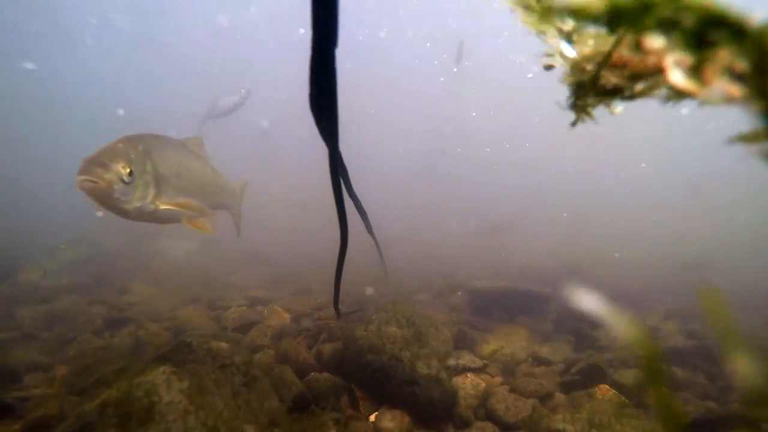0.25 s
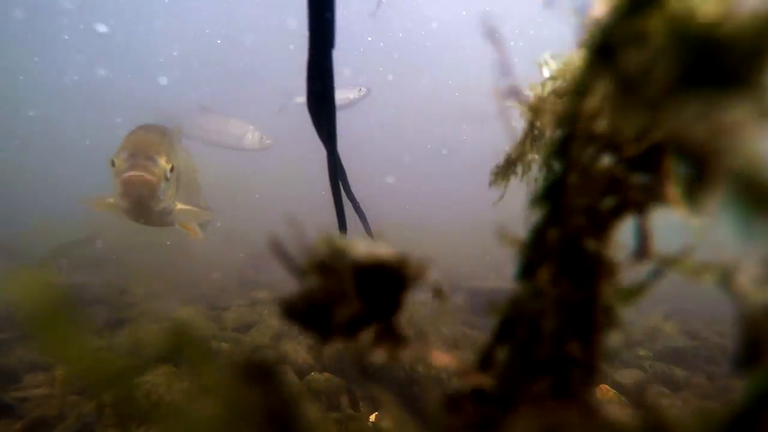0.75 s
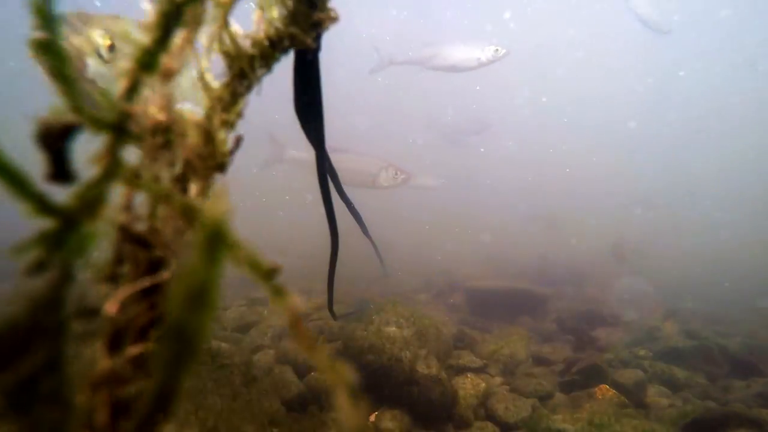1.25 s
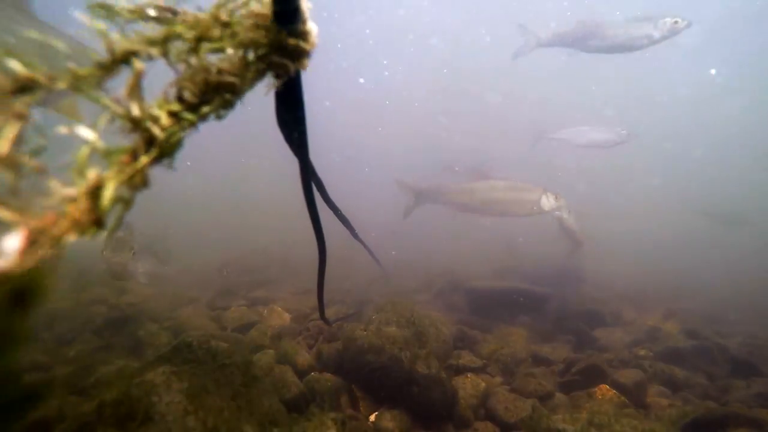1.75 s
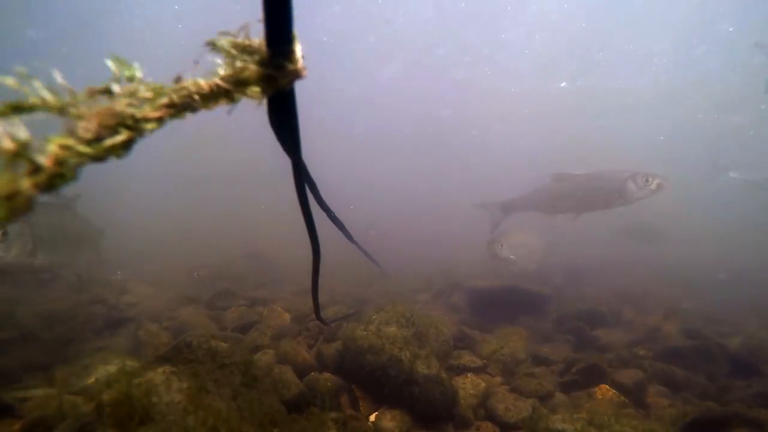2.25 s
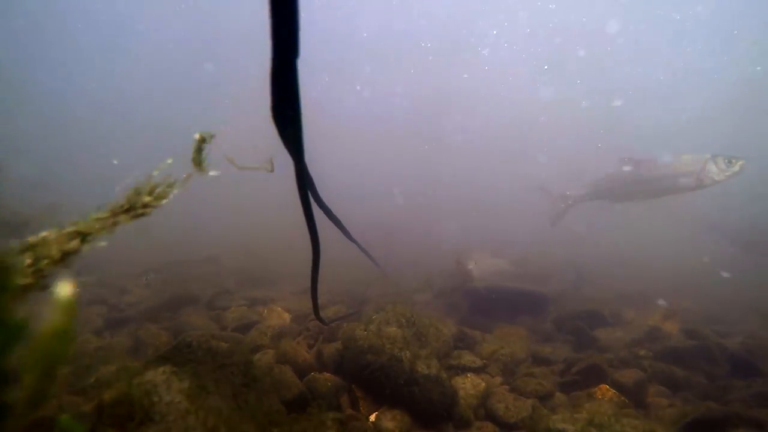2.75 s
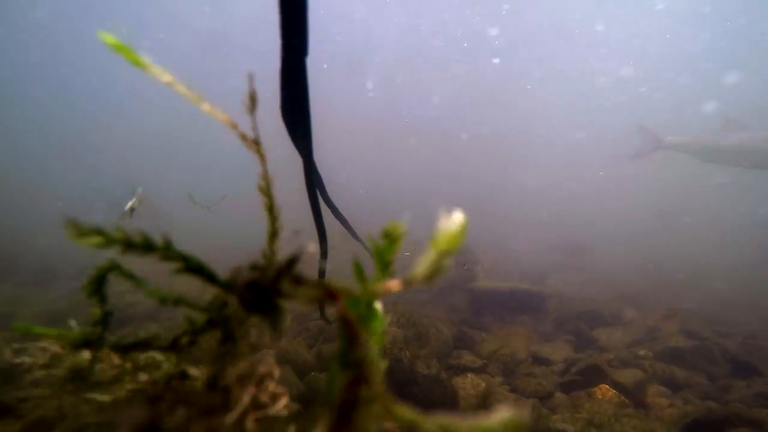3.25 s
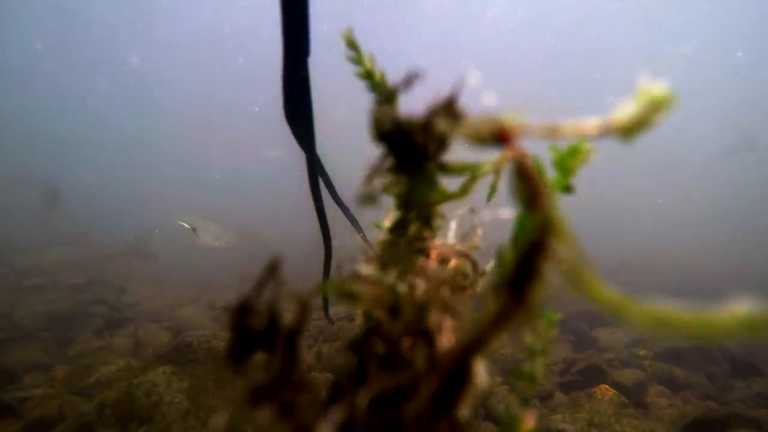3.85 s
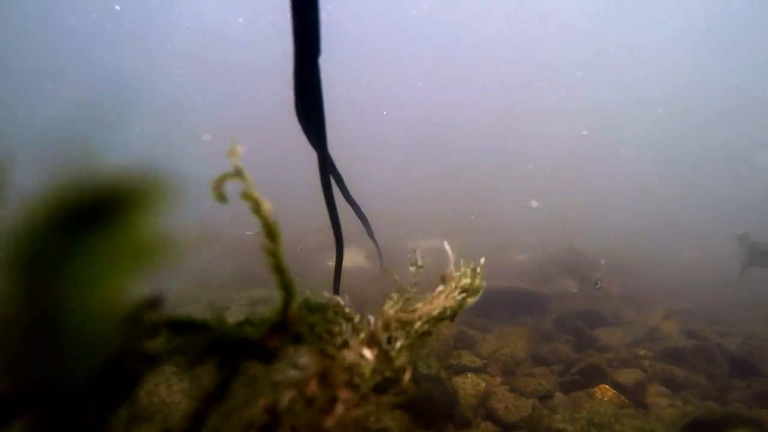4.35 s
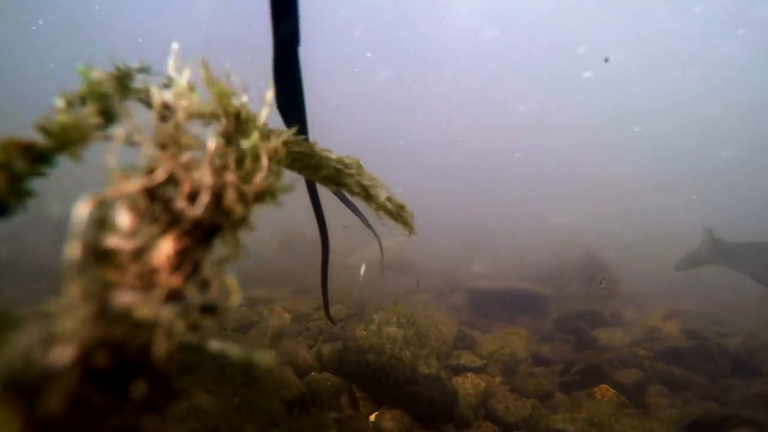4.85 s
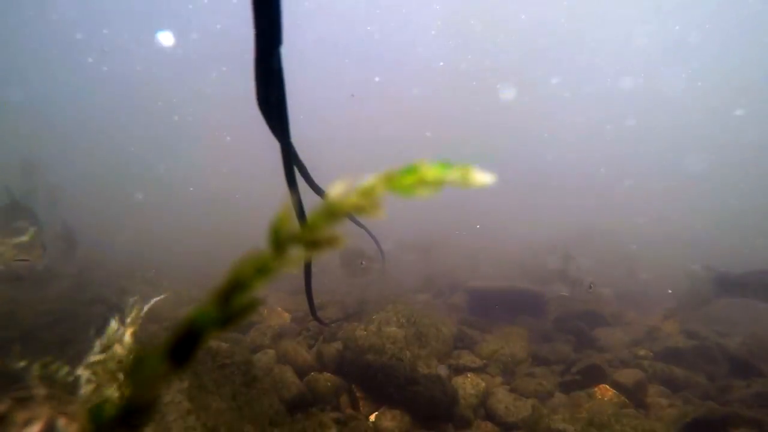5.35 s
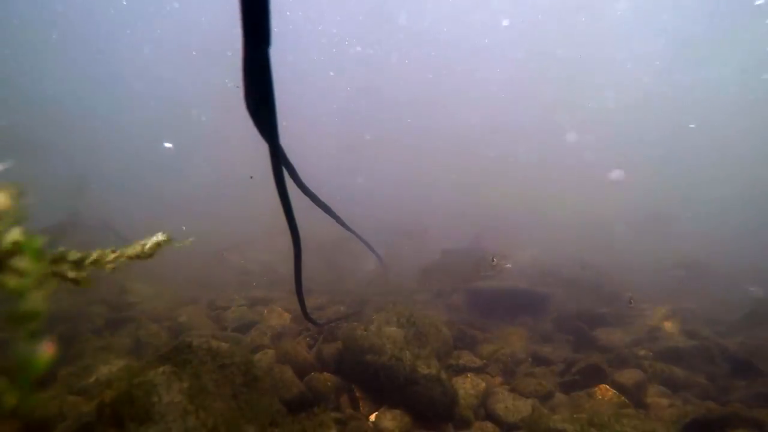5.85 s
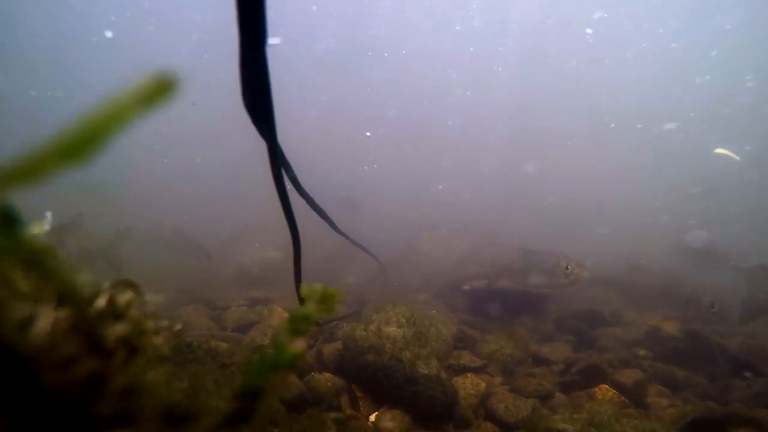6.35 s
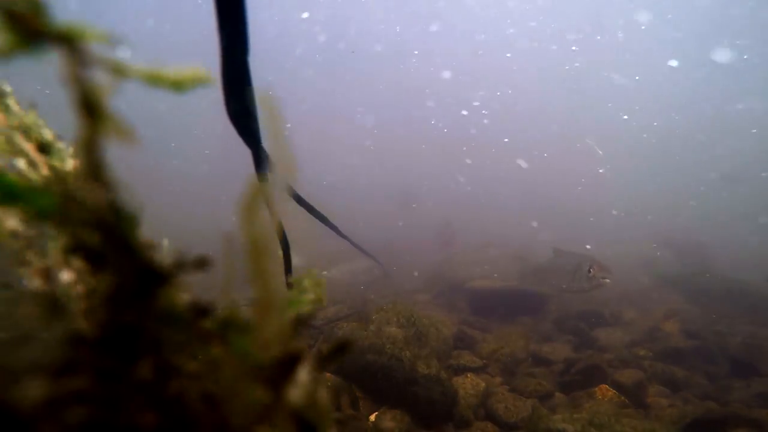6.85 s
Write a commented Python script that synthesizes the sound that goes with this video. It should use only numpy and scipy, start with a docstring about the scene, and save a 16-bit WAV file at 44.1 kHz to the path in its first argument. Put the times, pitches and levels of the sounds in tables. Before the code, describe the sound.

A close, muffled underwater sound from inside a watertight case on a stony river bed. Deep rumble dominates, swelling and easing in uneven lumps, over a hollow mid-low hum, gurgling, faint bubble fizz and thin hiss. In the first 0.2 s weed crackles and bumps softly among tiny ticks; a bubble bloops at 0.6 with a heavy shove, and more brushing passes around 0.7 and 1.15. A soft bump comes at 1.3. From 1.5 to 5.2 a barely audible focus motor chatters about ten times a second. Bubbles round off near 2.4 and 3.5, where the rumble surges. Around 4.0 to 4.1 weed crackles densely, with a thud and two hard gravel clicks. Bright ticks dot 4.2 to 5.3. The current dips at 5.5, a knock lands at 5.6, then rumble returns, with a bump at 6.4 and bubble plops at 6.2, 6.45 and 6.9. A faint motor whine appears near 7.0.

```python
"""Low rumble of eddies buffeting a camera's watertight case on a river bed below a small weir.
Shaped noise makes the rumble; resonant walls hum, and weed bumps the case with clicks and damped rings.
Gravel cracks, close bubbles and grit tick, larger bubbles swell and sink in pitch: short rings and noise.
Behind them lie a fizz of near and far bubbles, the microphone's filtered hiss, and the focus motor's
chatter of noise steps and brief sine whine."""
import sys
import numpy as np
from scipy import signal
from scipy.fft import rfft, irfft
from scipy.io import wavfile
from scipy.ndimage import uniform_filter1d

SR = 44100
rng = np.random.default_rng(int(sys.argv[2]) if len(sys.argv) > 2 else 0)


def output_pcm(signal):
    """Save a mono or channel-first signal as 16-bit PCM at the path in sys.argv[1].

    Samples are clipped to [-1, 1] before scaling.
    """
    pcm = np.clip(np.atleast_2d(signal).T, -1, 1) * 32767
    wavfile.write(sys.argv[1], SR, np.round(pcm).astype(np.int16))


N = 313110
TIME = np.arange(N) / SR


def amp(db):
    """Decibels to gain."""
    return 10 ** (np.asarray(db) / 20)


def unit(x):
    """Scales to rms 1."""
    return x / np.sqrt(np.mean(x ** 2) + 1e-20)


def steadied(x, size):
    """Holds the rms near 1 over every stretch of about size samples."""
    power = uniform_filter1d(uniform_filter1d(x ** 2, size), size)
    return x / np.sqrt(power + 1e-20)


def add(mix, s, sound):
    """Mixes a sound in at time s."""
    part = mix[max(round(s * SR), 0):][:len(sound)]
    part += sound[:len(part)]


def lowpass(x, hz):
    """Keeps what lies below hz, without delay."""
    return signal.sosfiltfilt(signal.butter(4, hz, fs=SR, output="sos"), x)


def decay(t, t60):
    """Exponential fade that falls by 60 dB in t60 seconds."""
    return np.exp(-np.log(1000) * t / t60)


def noise(spectrum):
    """Steady noise of rms 1 with the given spectrum."""
    hz, db = np.transpose(spectrum)
    bins = np.fft.rfftfreq(N, 1 / SR)
    gain = amp(np.interp(np.log(bins + 1), np.log(hz), db))
    return unit(irfft(rfft(rng.standard_normal(N)) * gain, N))


def wander(hz):
    """Random drift of rms 1, mostly no faster than about hz."""
    gain = np.exp(-(np.fft.rfftfreq(N, 1 / SR) / hz) ** 2)
    return unit(irfft(rfft(rng.standard_normal(N)) * gain, N))


def throb(hz, unevenness=0.391):
    """A swing between -1 and 1 that repeats about hz times a second, never quite evenly."""
    rate = hz * (1 + unevenness * wander(hz))
    return np.sin(2 * np.pi * np.cumsum(rate) / SR)


def swell(s, length):
    """A smooth arch from 0 up to 1 and back, centred on time s."""
    return np.cos(np.pi * np.clip((TIME - s) / length, -.5, .5)) ** 2


def ring(hz, t60, rise, sag=0.):
    """A dying sine of peak about 1; it swells in over rise seconds and its pitch falls by sag a second."""
    t = np.arange(SR // 5) / SR
    shape = (1 - np.exp(-(t / rise) ** 2)) * decay(t, max(t60, .002))
    return shape / shape.max() * np.sin(2 * np.pi * hz * (t - sag * t ** 2 / 2))


def snap(low_hz, high_hz, t60):
    """A burst of band-limited noise that starts near rms 1 and dies at once."""
    t = np.arange(SR // 5) / SR
    edges = [low_hz, np.clip(high_hz, low_hz + 1, SR / 3)]
    band = signal.butter(2, edges, "band", fs=SR, output="sos")
    burst = signal.sosfilt(band, rng.standard_normal(len(t)))
    return steadied(burst, size=90) * decay(t, t60)


def bubbles(per_s, low_hz, high_hz, t60, spread_db):
    """A swarm of rms 1: bubbles of random size are born at random moments, each ringing at its own pitch."""
    out, pitches = np.zeros(N), np.geomspace(low_hz, high_hz, num=24)
    for hz in pitches:
        births = rng.random(N) < per_s / len(pitches) / SR
        sizes = amp(spread_db * np.minimum(rng.exponential(1, N), 3))
        out += signal.oaconvolve(births * sizes, ring(hz, t60, rise=t60 / 10))[:N]
    return unit(out)


# Strength of the current at the case: (t/s, level/dB), scaled down where it moves quieter layers
CURRENT = [(0, -12), (0.18, 2), (0.46, -11), (0.8, -2.5), (1.15, -7), (1.6, -1.5), (2.35, -3.5),
           (2.7, -1.5), (3.08, -5.5), (3.4, 1.5), (4.1, 1), (4.75, -3.5), (5.32, 1), (5.54, -8), (6.0, -1),
           (6.28, 3), (6.65, 0.5), (7.1, 1.5)]


def flow_db():
    """Strength of the current over time, in dB, between its listed points."""
    return np.interp(TIME, *np.transpose(CURRENT))


# Weed brushing along the case: (middle t/s, length/s, crackle rise level/dB, buffeting rise level/dB)
WEED_BRUSHES = [(0.085, 0.22, 10.5, 9), (0.693, 0.28, 7, 0), (1.145, 0.28, 4.5, 2), (3.498, 0.46, -2.5, 4),
                (3.835, 0.17, -2, 7.5), (4.007, 0.23, 9, 9), (4.112, 0.13, 11.5, 10),
                (4.56, 0.27, 6.5, 7.5), (4.793, 0.13, -2, 8), (4.986, 0.12, 4, 8), (5.66, 0.19, -3, 5.5),
                (6.073, 0.14, -2, 5), (6.302, 0.17, 1, 9), (6.69, 0.15, 4.5, 4.5)]


def weed_db():
    """Rises of the crackle and of the buffeting, in dB, as weed brushes past."""
    crackle = sum(db * swell(s, length) for s, length, db, _ in WEED_BRUSHES)
    buffeting = sum(db * swell(s, length) for s, length, _, db in WEED_BRUSHES)
    return crackle, buffeting


# Microphone hiss spectrum, shape only: (f/Hz, level/dB per Hz)
HISS_SPECTRUM = [(100, 10.5), (900, 1), (3000, -2.5), (5000, -2.5), (6400, -4.5), (7500, -7.5),
                 (10500, -10), (13300, -9), (15000, -12.5)]


def hiss(level_db=-68.5):
    """The microphone's own steady noise."""
    return amp(level_db) * noise(HISS_SPECTRUM)


# Spectrum of the motor's steps, shape only: (f/Hz, level/dB per Hz)
STEP_SPECTRUM = [(4800, -18.5), (5900, -8), (6350, 5.5), (7300, -24), (8900, -7), (10400, -32),
                 (11550, -6.5), (11950, -12.5), (12300, -2), (13000, -13), (13600, -27)]
# Lens nudges, about ten a second: (middle t/s)
LENS_NUDGES = [1.466, 1.504, 1.538, 1.648, 1.739, 1.837, 1.944, 2.009, 2.117, 2.206, 2.308, 2.419, 2.511,
               2.585, 2.674, 2.774, 2.882, 2.987, 3.025, 3.185, 3.241, 3.36, 3.441, 3.507, 3.615, 3.708,
               3.807, 3.914, 3.993, 4.079, 4.177, 4.259, 4.344, 4.492, 4.527, 4.61, 4.72, 4.812, 4.913,
               4.993, 5.078, 5.203]


def focus_chatter(level_db=-66.5, step_s=0.0061, step_t60=0.017, jitter_s=0.00084, count=4):
    """Each nudge of the focus motor is a quick run of sharp little noise steps."""
    steps, t = np.zeros(N), np.arange(SR // 50) / SR
    for s in LENS_NUDGES:
        for k in range(count):
            even = s + (k - (count - 1) / 2) * step_s
            add(steps, even + jitter_s * rng.standard_normal(), decay(t, step_t60))
    return amp(level_db) * steps * steadied(noise(STEP_SPECTRUM), size=90)


# Longer runs of the focus motor: (middle t/s, length/s)
MOTOR_RUNS = [(1.367, 0.14), (7.04, 0.081)]


def focus_whine(db=-78.5, hz=10540, waver_hz=130):
    """The focus motor runs briefly with a thin, wavering whistle."""
    running = sum(np.sqrt(swell(s, length)) for s, length in MOTOR_RUNS)
    pitch = hz + waver_hz * wander(waver_hz)  # depth and speed of the waver share one figure
    return amp(db) * running * np.sin(2 * np.pi * np.cumsum(pitch) / SR)


# Spectrum of the far bubbles, shape only: (f/Hz, level/dB per Hz)
FAR_BUBBLES = [(600, -32), (1050, -22), (1400, -2), (2300, 1), (2800, -1), (3500, -2), (4300, -7.5),
               (9000, -46)]


def fizz(wash_db=-76.5, near_db=-78.0, clump_db=1.6, clump_hz=13.0, flow_share=0.035, crackle_db=-78):
    """A noise wash of far bubbles and clumps of nearer rings; brushing weed adds a dry, dense crackle."""
    near = bubbles(per_s=220, low_hz=1291, high_hz=3642, t60=0.033, spread_db=2.1)
    near *= amp(clump_db * wander(clump_hz))
    water = amp(wash_db) * noise(FAR_BUBBLES) + amp(near_db) * near

    weed, _ = weed_db()
    crackle = bubbles(per_s=1000, low_hz=1020, high_hz=3880, t60=0.0076, spread_db=2.5)
    crackle *= np.sqrt(np.maximum(amp(weed) ** 2 - 1, 0))  # silent unless weed raises the level
    return amp(flow_share * flow_db()) * water + amp(crackle_db) * crackle


# Wall resonances of the case: (f/Hz, width of one pass/Hz, level/dB)
WALL_MODES = [(617, 280, -3), (686, 145, 3), (859, 205, -8)]


def walls(x):
    """What the walls pass on of a push; each resonance acts twice, so its skirts are steep."""
    out = np.zeros(len(x))
    for k, (hz, width, db) in enumerate(WALL_MODES):
        b, a = signal.iirpeak(hz, hz / width, SR)
        passed = signal.lfilter(b, a, signal.lfilter(b, a, x))
        out += (-1) ** k * amp(db) * passed  # neighbouring modes in opposite phase
    return out


# Slow level of the hum in the walls: (t/s, level/dB)
WALL_HUM = [(0, 1), (0.95, -2.5), (1.9, -2), (2.6, 2), (3.45, 2), (4.1, 2.5), (4.35, -0.5), (6.4, 2),
            (7.1, 0)]


def hum(flutter_db=1.0, flutter_hz=25, wash_db=-75, gurgle_db=-78.5,
        flow_share=0.18, surge_db=1.5, surge_hz=5):
    """Churning water below the weir rings the walls in loose surges; large bubbles gurgle near their pitch."""
    churn = rng.standard_normal(N) * amp(flutter_db * wander(flutter_hz))
    gurgle = bubbles(per_s=55, low_hz=568.5, high_hz=762.3, t60=0.12, spread_db=3.5)
    level_db = np.interp(TIME, *np.transpose(WALL_HUM))
    level_db += flow_share * flow_db() + surge_db * wander(surge_hz)
    return amp(level_db) * (amp(wash_db) * unit(walls(churn)) + amp(gurgle_db) * gurgle)


# Larger passing bubbles: (peak t/s, peak level/dB, pitch at the peak f/Hz, fade t60/s)
LARGE_BUBBLES = [(0.618, -54.5, 729, 0.26), (0.618, -65, 1320, 0.08), (2.381, -61, 520, 0.074),
                 (3.42, -62, 620, 0.12), (3.575, -57.5, 614, 0.28), (3.583, -64, 940, 0.079),
                 (6.18, -63.5, 587, 0.27), (6.455, -55.5, 653, 0.057), (6.875, -58.5, 678, 0.16)]


def bloops(swell_s=0.0072, soft_s=0.0019, sag=0.815, wobble=0.015, wobble_hz=35):
    """Each larger bubble swells in, rounds off and fades; its pitch wobbles and falls by sag a second."""
    out, t = np.zeros(N), np.arange(-SR // 10, SR // 5) / SR
    away = np.hypot(t, soft_s) - soft_s  # distance from the peak in seconds, rounded at the top
    for s, db, hz, t60 in LARGE_BUBBLES:
        shape = np.exp(-away * np.where(t < 0, 1 / swell_s, np.log(1000) / t60))
        pitch = hz * (1 - sag * t + wobble * wander(wobble_hz)[:len(t)])
        tone = np.sin(2 * np.pi * np.cumsum(pitch) / SR)
        add(out, s + t[0], amp(db) * shape * tone)
    return out


# Nearest bubbles and grains: (t/s, level/dB before the trim, pitch f/Hz, snap level/dB re the ring)
NEAR_TICKS = [(0.044, -57.5, 2750, -5), (0.087, -57.5, 1800, 2), (0.101, -54.5, 3350, -10),
              (0.245, -55, 2820, -9), (0.678, -56.5, 2760, -8), (0.7245, -49, 1424, -9),
              (0.724, -57, 2280, -7), (1.026, -58, 3270, -3), (1.058, -59, 2700, -1),
              (1.120, -57.5, 3200, -4), (1.153, -60.5, 1550, -10), (1.189, -58, 2270, 4),
              (1.943, -59, 1870, -5), (2.015, -59.5, 2200, -8), (2.183, -55.5, 2380, -16),
              (3.123, -53.5, 1450, -1), (3.313, -51, 2190, -15), (3.411, -61, 1970, -14),
              (3.774, -52, 2410, -2.5), (3.823, -53.5, 1410, 5), (4.213, -56, 2280, -16),
              (4.456, -54, 3310, -11), (4.493, -62.5, 1430, 8.5), (4.570, -55, 1490, 2),
              (4.923, -49, 2180, -16), (5.104, -50.5, 2236, -14), (5.256, -56, 1400, -7),
              (5.301, -67, 2260, -8), (5.321, -55, 1420, 0), (5.532, -54, 3600, -9), (6.091, -49, 893, -17),
              (6.181, -60, 1400, -16), (6.273, -57, 1550, -13), (6.326, -52.5, 1810, -6),
              (6.415, -61.5, 1730, 5), (6.483, -59, 1880, -10), (6.686, -58, 2450, -5),
              (6.717, -60, 2500, -6), (6.851, -58, 1600, -7), (6.943, -56.5, 2010, -14)]


def ticks(trim_db=-2.5, ring_t60=0.034, ring_hz=2100, shortening=0.44, snap_t60=0.019,
          snap_below=0.67, snap_reach=1.66, rise_share=0.027, sag=0.8, debris_db=-15, debris_t60=0.076):
    """A short ring with a snap of noise and a faint debris tail; low ones ring longer and rise more gently."""
    out = np.zeros(N)
    for s, db, hz, snap_db in NEAR_TICKS:
        band = (hz * snap_below, hz * snap_reach)
        t60 = ring_t60 * (ring_hz / hz) ** shortening  # ring_t60 holds at ring_hz
        tone = ring(hz, t60, rise_share * t60, sag)
        edge = snap(*band, snap_t60) + amp(debris_db) * snap(*band, debris_t60)
        add(out, s, amp(db + trim_db) * (tone + amp(snap_db) * edge))
    return out


# High modes of the case's shell: (f/Hz, t60/s)
SHELL_MODES = [(1250, 0.02), (1800, 0.021), (3400, 0.015), (3850, 0.012)]
# Gravel hits, each at another spot: (t/s, crack level/dB, then peak level/dB of each of four shell modes)
GRAVEL_HITS = [(4.062, -66, -51, -46.5, -51, -64), (4.118, -48.5, -47, -49, -54, -41.5)]


def gravel(crack_low_hz=3300, crack_high_hz=7500, crack_t60=0.013, rise_cycles=0.61):
    """Gravel hits the case with a dry noise crack; high shell modes speak at once, low ones a moment later."""
    out = np.zeros(N)
    for s, crack_db, *mode_dbs in GRAVEL_HITS:
        add(out, s, amp(crack_db) * snap(crack_low_hz, crack_high_hz, crack_t60))
        for (hz, t60), db in zip(SHELL_MODES, mode_dbs):
            add(out, s, amp(db) * ring(hz, t60, rise=rise_cycles / hz))
    return out


# Modes of the rocking case: (f/Hz before each bump's pitch ratio, relative level/dB, t60/s)
THUD_MODES = [(99.4, 10, 0.065), (165, -7.5, 0.039), (226, 0, 0.085)]
# Soft bumps: (t/s, thud level/dB before mode levels and trim, wall ring level/dB re the thud level,
# contact click level/dB, thud pitch ratio)
WEED_BUMPS = [(0.094, -47, -32, -68, 0.98), (1.322, -49.5, -14, -74, 0.99), (2.359, -50.5, -15, -78, 0.97),
              (3.372, -59.5, 8, -56, 1.04), (4.063, -45, -16, -64, 0.97), (5.5831, -44.5, -2, -57, 1),
              (6.088, -54.5, 0, -76, 1.07), (6.374, -43, -3.5, -56, 0.91)]


def bumps(trim_db=-5.0, lag_s=0.0019, wall_t60=0.047, click_low_hz=1300, click_high_hz=2400,
          click_t60=0.023, ragged_db=3.5, ragged_hz=90):
    """Weed clicks on the case: walls ring first, then the case thuds, ragged as the weed drags on."""
    out, thuds = np.zeros(N), np.zeros(N)
    knock = sum(amp(db) * ring(hz, wall_t60, rise=0.0016) for hz, _, db in WALL_MODES)
    for s, db, wall_db, click_db, pitch in WEED_BUMPS:
        add(out, s, amp(click_db) * snap(click_low_hz, click_high_hz, click_t60))
        add(out, s, amp(db + wall_db + trim_db) * knock)
        thud = sum(amp(mode_db) * ring(hz * pitch, t60, rise=0.0054) for hz, mode_db, t60 in THUD_MODES)
        add(thuds, s + lag_s, amp(db + trim_db) * thud)
    return out + thuds * amp(ragged_db * wander(ragged_hz))


# Spectrum of the eddies' push, before the bands are levelled: (f/Hz, level/dB per Hz)
EDDY_SPECTRUM = [(8, -18.5), (20, -8), (33, 1.5), (44, -3.5), (56, 0), (70, -14), (105, -14), (150, -21.5),
                 (200, -27.5), (240, -30), (266, -38), (450, -44.5), (1200, -66.5)]
# Single large eddies that shove the case: (middle t/s, rise level/dB)
EDDY_SHOVES = [(0.62, 12), (0.83, 5), (1.47, 5), (2.67, 6), (3.541, 10), (4.53, 7.5), (5.36, 4.5),
               (6.6, 7.5)]


def rumble(split_hz=72, rub_hz=155, large_db=-45.0, small_db=-61.5, shove_s=0.11,
           lump_db=3.0, lump_hz=5.6, jostle_db=1.17, jostle_hz=8.7, small_share=0.042, rub_share=0.4):
    """Large eddies press in lumps with the current; small ones buffet faster, and weed rubs, mostly low."""
    push = noise(EDDY_SPECTRUM)
    large = lowpass(push, split_hz)
    small = steadied(push - large, size=SR // 14)
    large = steadied(large, size=SR // 14)

    shoves = sum(db * swell(s, shove_s) for s, db in EDDY_SHOVES)
    pressing = amp(large_db + flow_db() + shoves + lump_db * throb(lump_hz))

    _, weed = weed_db()
    dull = lowpass(small, rub_hz)
    rubbed = amp(weed) * dull + amp(rub_share * weed) * (small - dull)
    buffeting = amp(small_db + small_share * flow_db() + jostle_db * wander(jostle_hz))
    return pressing * large + buffeting * rubbed


def scene():
    """The river, the case and the camera's own noises sum at one microphone."""
    camera = hiss() + focus_chatter() + focus_whine()
    water = fizz() + hum() + bloops() + rumble()
    contacts = ticks() + gravel() + bumps()
    return (camera + water + contacts)[None]


def record(dry, edge_hz=15350):
    """The recorder's band limit: a steep low-pass at edge_hz."""
    band_limit = signal.firwin(1023, edge_hz, window=("kaiser", 9), fs=SR)
    return signal.oaconvolve(dry, band_limit[None], "same")


dry = scene()
out = record(dry)
output_pcm(out)
```